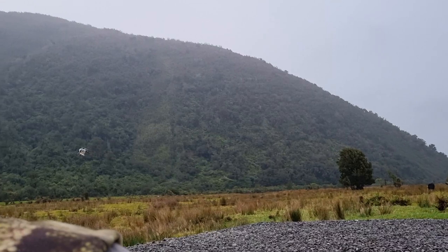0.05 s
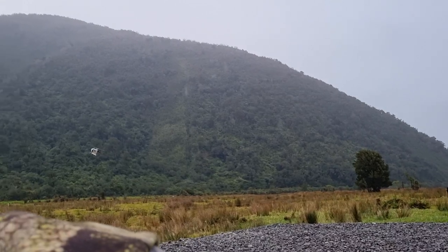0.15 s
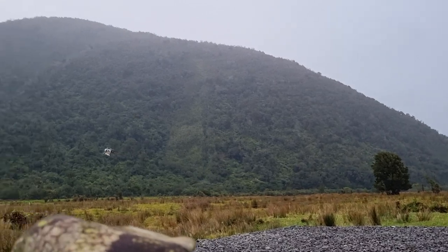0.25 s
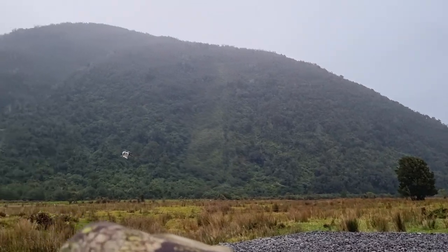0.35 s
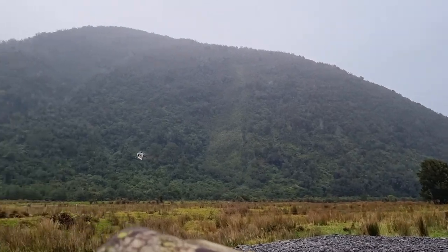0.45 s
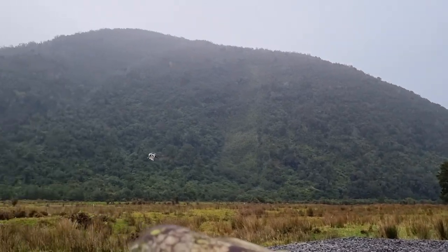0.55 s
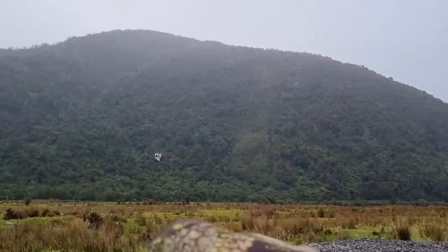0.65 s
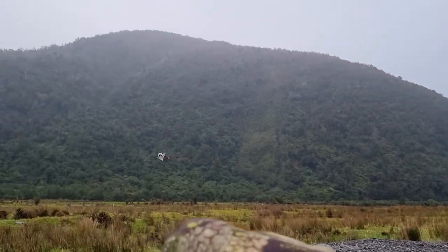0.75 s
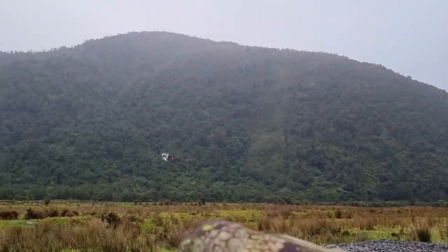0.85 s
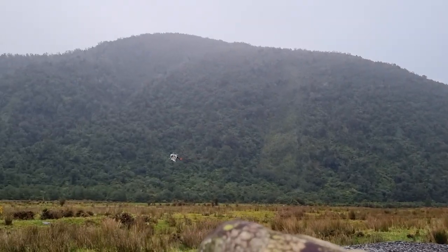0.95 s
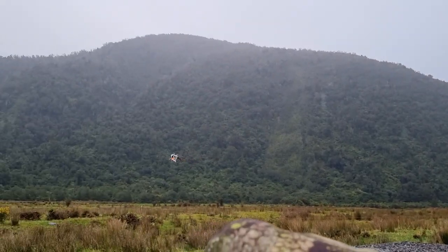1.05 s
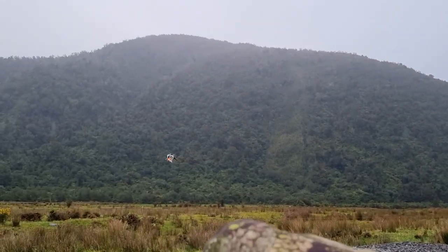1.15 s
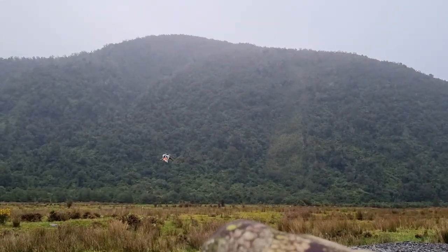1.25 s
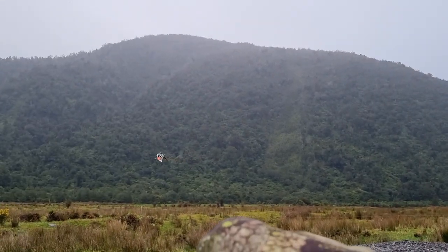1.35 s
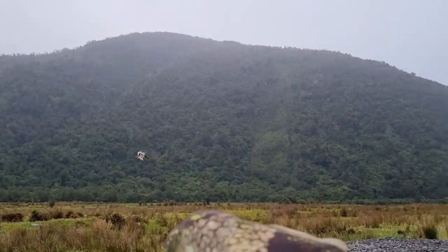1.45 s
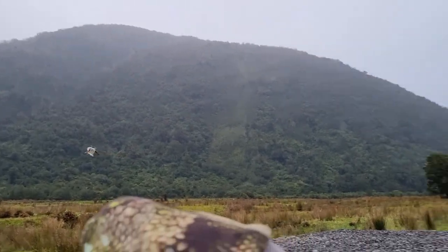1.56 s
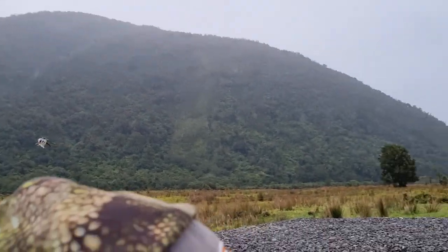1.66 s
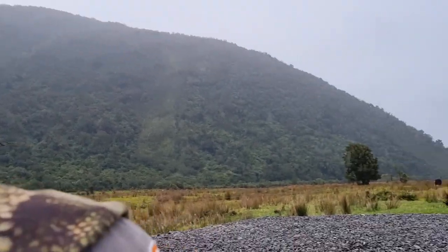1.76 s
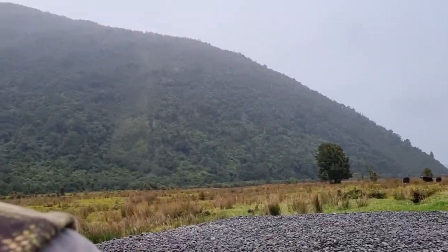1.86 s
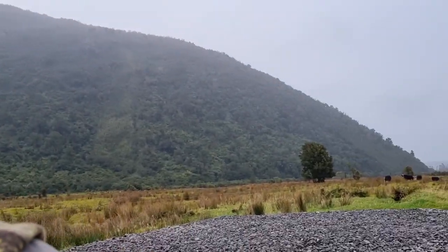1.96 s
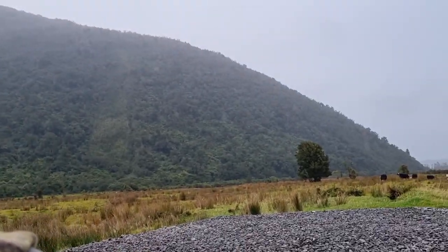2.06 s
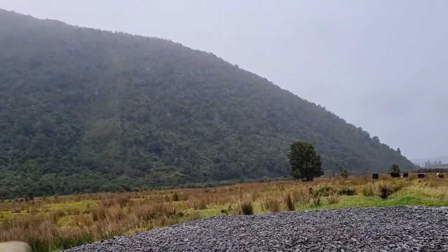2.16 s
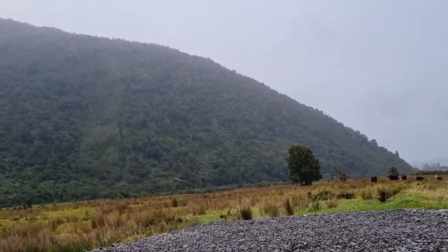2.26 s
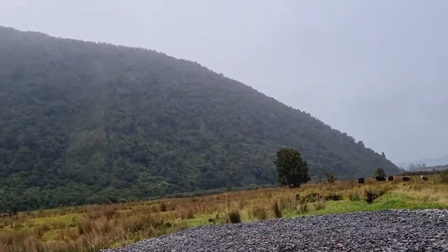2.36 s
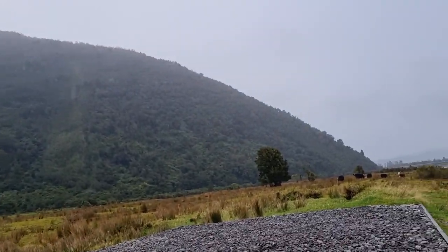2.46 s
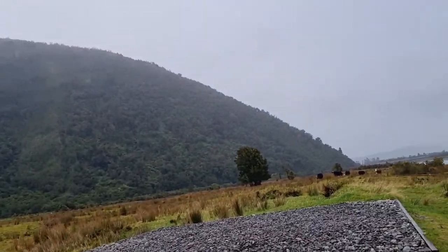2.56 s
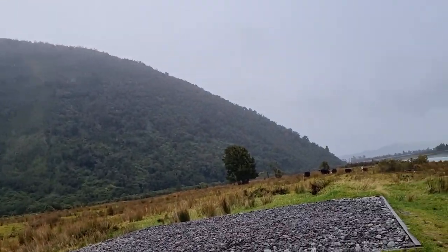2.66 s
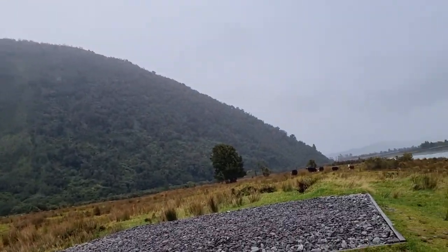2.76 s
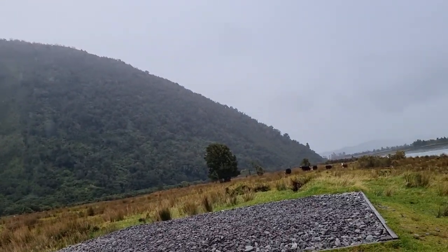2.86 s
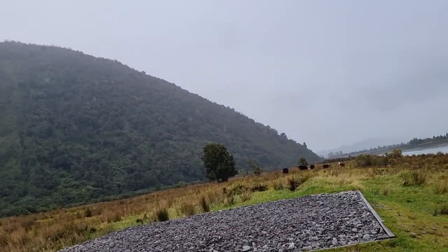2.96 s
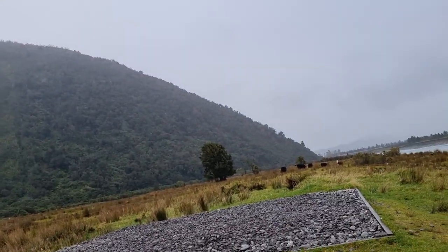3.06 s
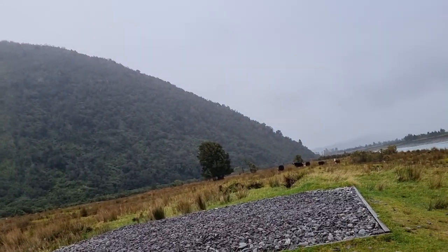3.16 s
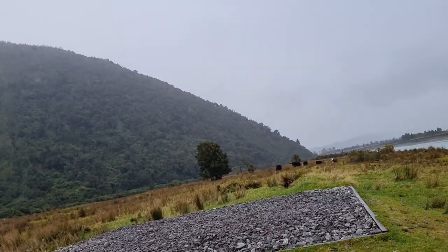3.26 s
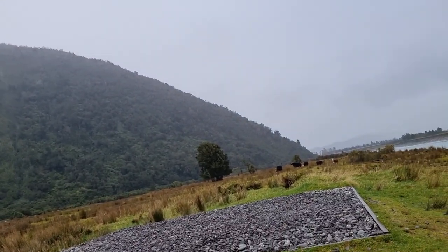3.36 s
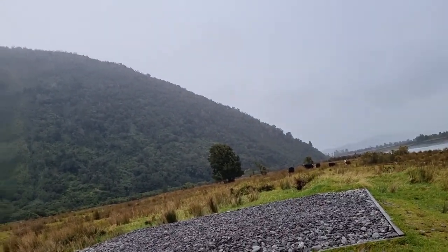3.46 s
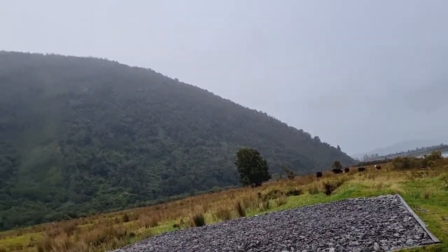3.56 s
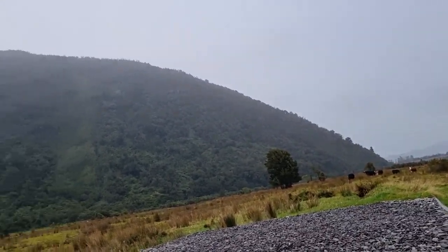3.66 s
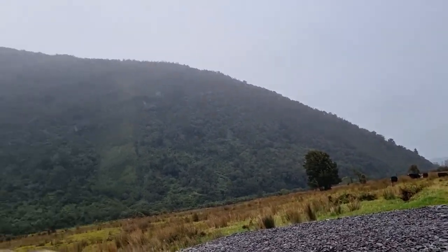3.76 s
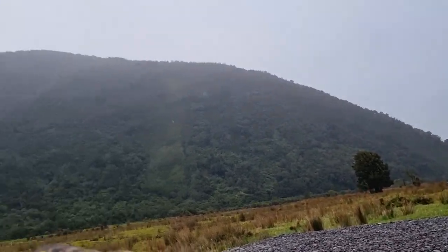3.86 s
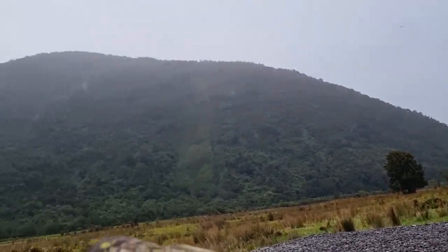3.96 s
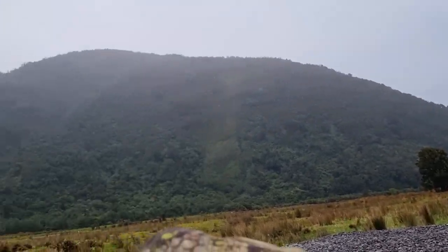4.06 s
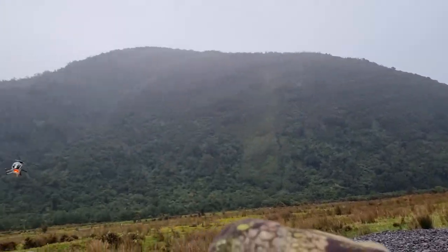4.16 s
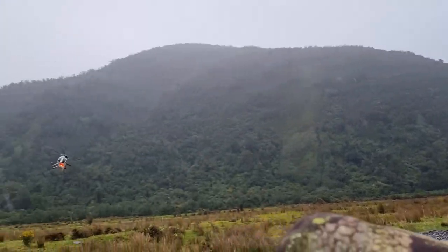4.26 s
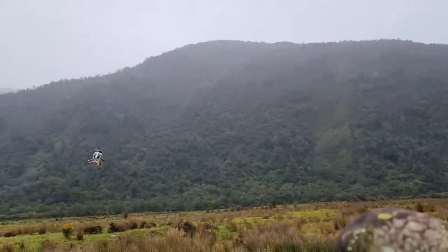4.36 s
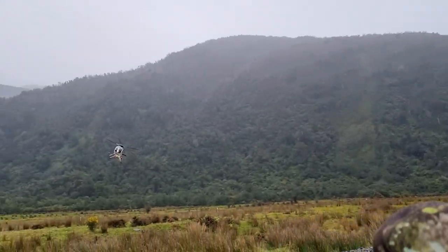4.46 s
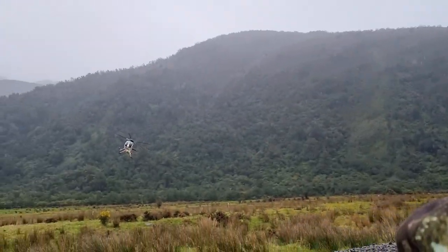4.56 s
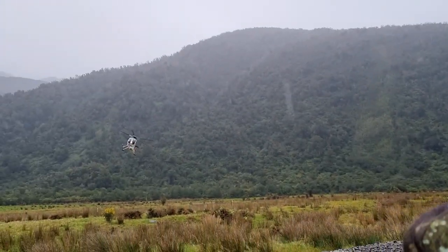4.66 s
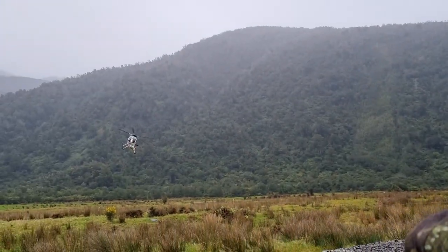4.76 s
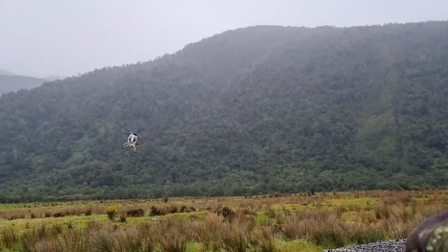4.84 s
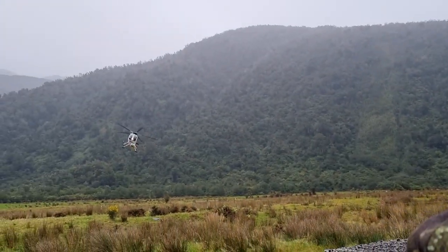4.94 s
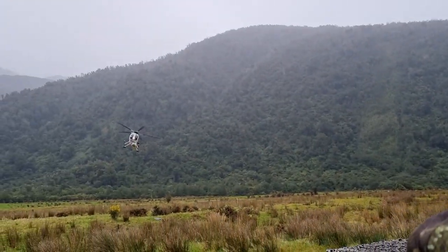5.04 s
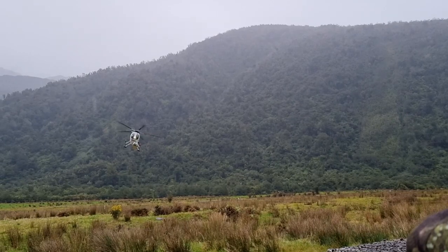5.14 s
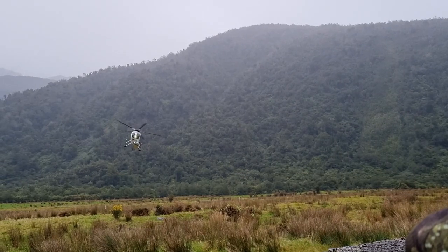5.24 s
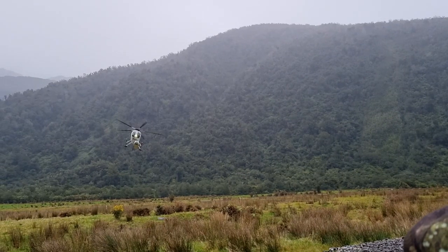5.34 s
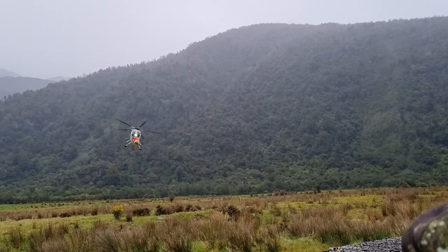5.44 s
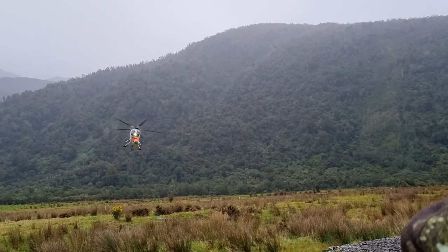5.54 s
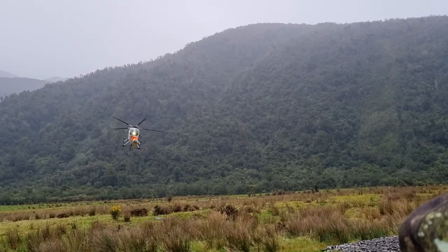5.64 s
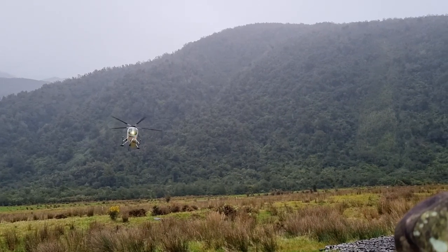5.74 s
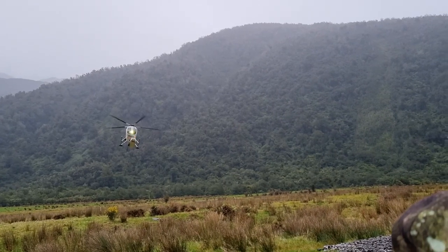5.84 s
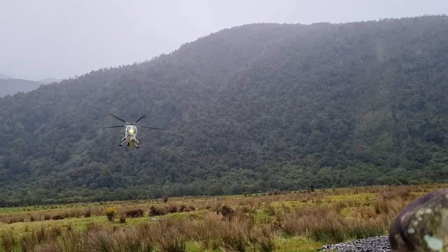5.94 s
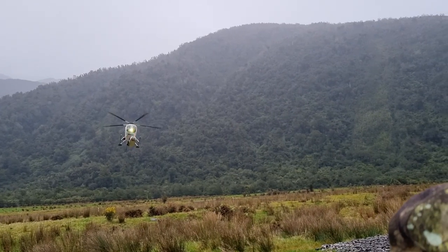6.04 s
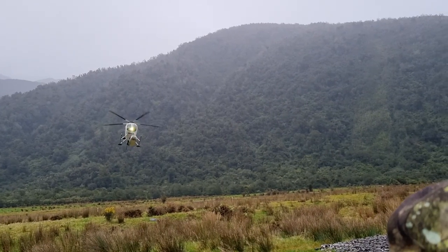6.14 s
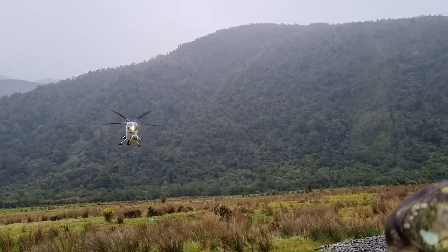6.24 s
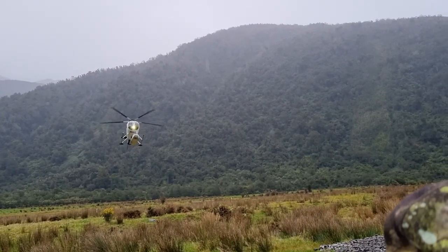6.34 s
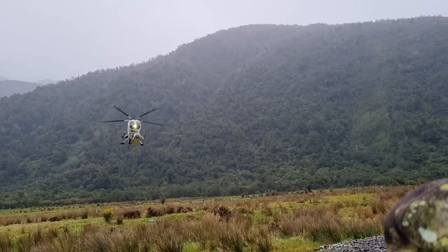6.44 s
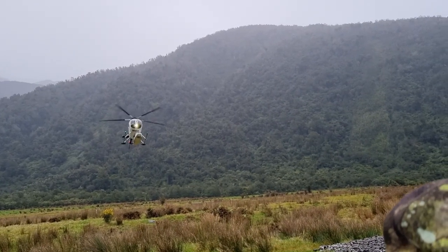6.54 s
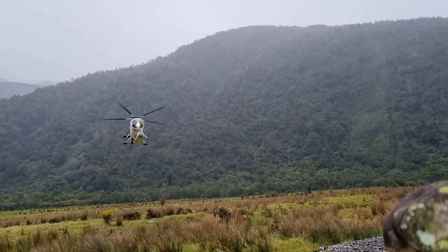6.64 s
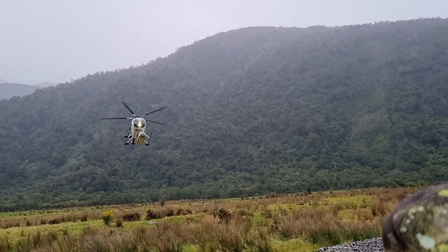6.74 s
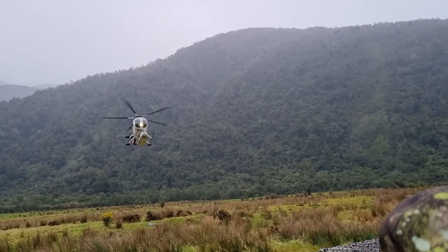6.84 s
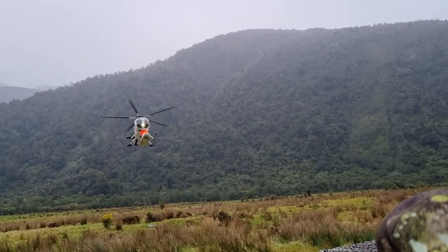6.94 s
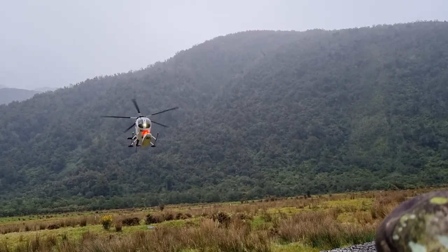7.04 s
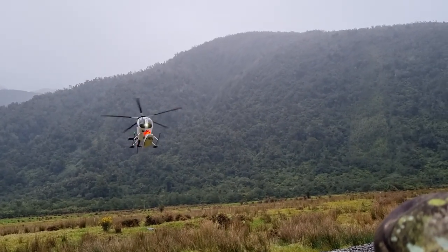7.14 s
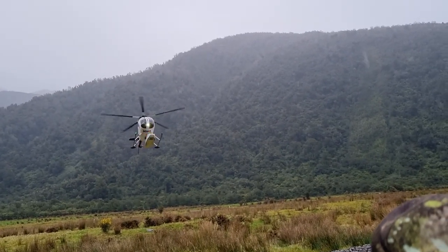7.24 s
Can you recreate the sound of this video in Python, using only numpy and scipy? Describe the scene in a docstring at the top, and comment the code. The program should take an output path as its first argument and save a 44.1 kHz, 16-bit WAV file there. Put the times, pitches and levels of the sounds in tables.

```python
"""A valley: a helicopter flies in low and slows to land in front of a hand-held pair of microphones.
Far off, the rotor throbs (blade-pass harmonics) under a wash of air noise (filtered, chopped noise).
As the machine slows, its blades cut their own tip vortices and slap (clusters of filtered pulses).
The tail rotor drones and a gear whines faintly (sines); the turbines hiss (noise); light ticks tap nearby.
The microphones swing away and back: port delay, echoes and colour follow."""
import sys
import numpy as np
from scipy import signal
from scipy.fft import rfft, irfft, next_fast_len
from scipy.io import wavfile
from scipy.ndimage import uniform_filter1d, map_coordinates

SR = 44100
rng = np.random.default_rng(int(sys.argv[2]) if len(sys.argv) > 2 else 0)


def store_pcm(level_fs):
    """Save levels as 16-bit WAV."""
    pcm = np.round(np.clip(level_fs, -1, 1) * 32767).astype(np.int16)
    wavfile.write(sys.argv[1], SR, np.atleast_2d(pcm).T)


N = 321930
TIME = np.arange(N) / SR

BLADE_HZ, FIRST_PASS = 41.9, 0.637  # main blade rate when hovering; share of a pass turned at the start
SOUND_SPEED_M_PER_S = 343
THIRD_ORDER_RE_SLAP_DB, SNAP_RE_SLAP_DB = -2.5, -27

# Boom of the rotor, second blade-pass order. Each row: time in seconds, level in dB.
BOOM_LEVEL = [(0.1, -37), (0.18, -32), (0.61, -38), (0.87, -30.5), (1.46, -33), (3.74, -25), (4.67, -36),
              (5.87, -16.5), (6.2, -19), (6.5, -21), (7.2, -18.5)]


def throb(passes, waver_db=1.03):
    """Each blade pushes a pressure wave ahead of it; the orders waver in moving air, the higher ones more."""
    first_db = approach_db(far_db=-37.5, near_db=-29)
    boom_db = in_time(BOOM_LEVEL)[0]
    third_db = np.maximum(approach_db(far_db=-57, near_db=-36), flare_db() + THIRD_ORDER_RE_SLAP_DB)
    out = 0
    for order, db in enumerate([first_db, boom_db, third_db], 1):
        late = .47 + .003 * order * drift(8)
        gain = np.sqrt(2) * from_db(db + waver_db * order * drift(22.0))
        out = out + gain * np.cos(2 * np.pi * order * (passes - late))
    return at_ports(out, bend=3.3)


# Low push of each slap, blade-pass orders 4 to 7. Each entry: peak level in dB against the slap.
PUSH_RE_SLAP_DB = [-6, -14.5, -20.5, -15.5]
# Vortex cut moving round the disc as the rotor tilts. Each row: time in seconds, lateness in blade passes.
CUT_LATENESS = [(4.6, -.17), (5.0, -.08), (5.4, -.03), (5.8, .04), (6.6, .005), (7.3, -.01)]
# Spectrum of thud and crack. Each row: frequency in Hz, relative level in dB.
KNOCK_SPECTRUM = [(215, -4.5), (280, -1), (385, 6), (450, 2), (540, 2.5), (780, 4.5), (900, -2),
                  (1200, 0.5), (1600, -3), (2000, -10.5), (3500, -28)]
# Spectrum of the bright snap. Each row: frequency in Hz, relative level in dB.
SNAP_SPECTRUM = [(1600, 9), (1900, 3.5), (2200, 9), (2550, -4), (2950, 12.5), (3400, -0.5), (4200, 3.5),
                 (6000, -3)]


def slap(passes):
    """The vortex cuts: a thud, a crack above it and a bright snap on its front."""
    thud_db, crack_db, snap_db = slap_levels()
    turned = passes - in_time(CUT_LATENESS)[0]
    cuts = blade_pulses(turned, spread_s=.00078, jitter_s=.00016, uneven_db=0.7)
    raw_knock = rms_one(cuts) + .45 * torn_air(cuts, decay_s=.003)
    knock = steady(colour(raw_knock, KNOCK_SPECTRUM, 200, 2300))
    thud = colour(knock, [(900, 0)], high_hz=900)
    crack = knock - thud
    fronts = blade_pulses(turned, spread_s=.0004, jitter_s=.0002, uneven_db=1)
    snap = steady(colour(torn_air(fronts, decay_s=.0007), SNAP_SPECTRUM, 1450, 4500))
    push = sum(from_db(db) * np.cos(2 * np.pi * k * turned) for k, db in enumerate(PUSH_RE_SLAP_DB, 4))
    body = from_db(thud_db) * thud + from_db(crack_db) * crack + from_db(flare_db()) * push
    return at_ports(body, bend=1.54) + at_ports(from_db(snap_db) * snap, bend=0.81)


SLAP_START_S, SLAP_FULL_S = 4.75, 5.68
SLAP_START_DB, SLAP_FULL_DB, CRUISE_SLAP_DB = -30.5, -21, -61
SLAP_ONSET_DB_PER_S, SLAP_EASE_DB_PER_S = 83, 1


def flare_db():
    """Strength of the blade slap: quick onset, build-up and slow easing."""
    build = np.interp(TIME, [SLAP_START_S, SLAP_FULL_S], [SLAP_START_DB, SLAP_FULL_DB])
    onset = SLAP_ONSET_DB_PER_S * np.maximum(SLAP_START_S - TIME, 0)
    ease = SLAP_EASE_DB_PER_S * np.maximum(TIME - SLAP_FULL_S, 0)
    return np.maximum(build - onset - ease, CRUISE_SLAP_DB)


HARD_FADE_DB_PER_S = 302  # to either side of a hard slap
# Hard slaps, where a blade meets a strong old vortex.
# Each row: time in seconds, thud in dB, crack in dB, snap in dB.
STRONG_VORTEX_CUTS = [(4.991, -29, -15, -34), (5.062, -20.5, -22, -40), (5.085, -19.5, -19.0, -40),
                      (5.11, -20.5, -11, -35), (5.18, -18, -18.5, -39), (5.229, -20.5, -15, -33.5),
                      (5.348, -17.0, -14, -34), (5.371, -13, -23, -30), (5.397, -17, -16.5, -31.5),
                      (5.419, -14, -13, -40.5), (5.442, -19.0, -22, -44.5), (5.538, -14, -11.5, -44.5),
                      (5.563, -14.5, -14.5, -39.0), (5.611, -14, -14.5, -39), (5.636, -16.5, -12, -37),
                      (5.659, -15.0, -18.0, -41), (5.682, -15.0, -12, -33), (5.731, -16.5, -17.5, -37),
                      (5.756, -16.0, -9.5, -35), (5.779, -15.5, -15, -35.5), (5.802, -17, -13.5, -36),
                      (5.826, -19, -17, -38.5), (5.875, -17.5, -24.0, -43), (5.898, -13.5, -16, -35.5),
                      (5.921, -14.0, -15.0, -40.5), (5.97, -16.5, -23.0, -39.5),
                      (5.994, -15.5, -20.5, -40.0), (6.018, -14.0, -13, -31.5), (6.039, -14, -13, -42.5),
                      (6.063, -16.5, -21, -45.5), (6.089, -19, -16, -40.5), (6.113, -16, -17.5, -39.5),
                      (6.136, -15, -16.5, -33), (6.159, -14.5, -15, -41.5), (6.183, -17.0, -14, -41),
                      (6.255, -17.5, -16, -34), (6.278, -16.5, -14, -36.0), (6.302, -16.0, -12.5, -34),
                      (6.35, -17, -25.0, -46.5), (6.374, -13.5, -15.0, -35.0), (6.398, -17.0, -13, -38),
                      (6.421, -14, -11.5, -38), (6.54, -14.5, -13, -37), (6.564, -13.5, -19, -42.0),
                      (6.588, -18, -20, -44.5), (6.612, -18, -19.5, -41.5), (6.659, -16.5, -10.5, -27),
                      (6.706, -13.5, -14, -32), (6.755, -16, -18.5, -35.0), (6.778, -20, -11.5, -25.5),
                      (6.802, -15, -21.0, -32), (6.826, -17.5, -16, -30.5), (6.897, -18, -12.5, -28.5),
                      (6.921, -17.5, -20.5, -34.0), (6.945, -16, -15.5, -27), (7.016, -16.5, -16.0, -29.5),
                      (7.136, -18.0, -16.0, -30), (7.159, -16.5, -20, -40), (7.184, -17.5, -16.5, -38.0),
                      (7.208, -17.5, -11.5, -35), (7.256, -19, -16, -29.5)]


def slap_levels():
    """Thud, crack and snap in dB; each strong vortex lifts them briefly."""
    levels = flare_db() + np.array([[0], [0], [SNAP_RE_SLAP_DB]])
    for s, *hard_db in STRONG_VORTEX_CUTS:
        near = slice(int(s * SR) - SR // 10, int(s * SR) + SR // 10)
        lift_db = np.array(hard_db)[:, None] - HARD_FADE_DB_PER_S * np.abs(TIME[near] - s)
        levels[:, near] = np.maximum(levels[:, near], lift_db)
    return levels


def blade_pulses(passes, spread_s, jitter_s, uneven_db):
    """Each blade pass gives four pulses of alternating sign within milliseconds, of fairly even total energy."""
    when = np.interp(np.arange(np.ceil(passes[0]), passes[-1]), passes, TIME)[:, None]
    chance = rng.standard_normal((len(when), 10))
    place = np.arange(4) - 1.5
    signs = (-1) ** np.arange(1, 5)
    sizes = signs * np.exp(-np.abs(place + .5) / 2.5) * (1 + .2 * chance[:, 2:6])
    sizes = sizes / np.linalg.norm(sizes, axis=1, keepdims=True)
    sizes = sizes * from_db(uneven_db * np.tanh(chance[:, 1:2]))
    at_s = when + jitter_s * chance[:, :1] + spread_s * (place + .27 * chance[:, 6:])
    pulses = np.zeros(N)
    pulses[np.clip(at_s * SR, 0, N - 1).astype(int)] = sizes
    return pulses


def torn_air(pulses, decay_s):
    """Each pulse leaves a burst of turbulence that dies within milliseconds."""
    envelope = signal.lfilter([1], [1, -np.exp(-1 / (decay_s * SR))], np.abs(pulses))
    return rms_one(envelope * rng.standard_normal(N))


# Advancing tip moving round the disc as the rotor tilts. Each row: time in seconds, lateness in blade passes.
TIP_LATENESS = [(1.9, -.17), (3.2, -.12), (4.0, -.02), (4.5, .08), (5.4, .2), (6.0, .23)]
# Swish of the advancing tip. Each row: time in seconds, hollow chop in dB, bright edge in dB.
TIP_LEVELS = [(1.6, -43, -48), (2.6, -45.5, -50), (3.3, -37, -46), (3.9, -33, -41.5), (4.2, -31.5, -36.5),
              (4.45, -32.5, -32.5), (5.0, -29.5, -34), (5.8, -33.5, -39.5), (7.3, -40, -41.5)]
# Spectrum of the hollow chop. Each row: frequency in Hz, relative level in dB.
TIP_CHOP_SPECTRUM = [(500, -3.5), (900, 0), (1300, 5), (1650, 2.5), (2000, 1.5)]
# Spectrum of the bright edge. Each row: frequency in Hz, relative level in dB.
TIP_EDGE_SPECTRUM = [(2300, 2.5), (2700, -3), (3300, 7.5), (4200, -4.5), (5000, -7), (6200, 0),
                     (8000, -7.5)]


def tip_swish(passes, early_passes=.05):
    """Each advancing tip throws a short burst of noise forwards: a hollow chop with a bright edge."""
    turned = passes - in_time(TIP_LATENESS)[0] + early_passes
    tips = blade_pulses(turned, spread_s=.0008, jitter_s=.0002, uneven_db=1)
    bursts = torn_air(tips, decay_s=.0011)
    chop_db, edge_db = in_time(TIP_LEVELS)
    hollow = from_db(chop_db) * steady(colour(bursts, TIP_CHOP_SPECTRUM, 420, 1950))
    edge = from_db(edge_db) * steady(colour(bursts, TIP_EDGE_SPECTRUM, 2230, 7200))
    return at_ports(hollow, bend=1.7, most_ms=0.39) + at_ports(edge)


# Spectrum of the buffet. Each row: frequency in Hz, relative level in dB.
BUFFET_SPECTRUM = [(185, 7), (230, -15), (280, -41), (340, -2.5), (390, 2.5), (470, 3)]


def buffet(passes):
    """A low fluttering roar as the slowing rotor sinks into its own wake: chopped narrow-band noise."""
    level_db = air_db(far_db=-53, near_db=-46, swell_db=21, swell_s=5.41, width_s=1)
    roar = turbulence(BUFFET_SPECTRUM, 233, 357, scattered=0.074, bend=2.9)
    return from_db(level_db) * roar * chop(passes, 0.51, 0.047)


# Spectrum of the wake rumble. Each row: frequency in Hz, relative level in dB.
WAKE_SPECTRUM = [(25, -32), (55, -15), (100, -2.5), (135, 0.5), (170, -7), (200, -10), (290, -14)]
# Spectrum of the downwash. Each row: frequency in Hz, relative level in dB.
WASH_SPECTRUM = [(260, -12), (320, 1), (390, 1), (440, -3), (520, 4), (610, -3.5), (730, 0.5), (900, 1)]
# Spectrum of the blade swish. Each row: frequency in Hz, relative level in dB.
SWISH_SPECTRUM = [(900, 4), (1030, 7), (1200, 8.5), (1450, 6), (1650, 5.5), (1900, -7.5)]
# Spectrum of exhaust, hiss and sizzle. Each row: frequency in Hz, relative level in dB.
JET_SPECTRUM = [(1850, 12.5), (2100, 11.5), (2450, 5), (3100, 9), (4100, 4.5), (5000, -3), (6400, 0.5),
                (7400, -5.5), (8700, -5.5), (10500, -16.5), (12500, -18), (16000, -17.5)]
# Turbine hiss. Each row: time in seconds, level in dB before HISS_GAIN_DB.
HISS_LEVEL = [(0.15, -49.5), (0.41, -51), (1.02, -47), (2.68, -44.5), (4.04, -38), (4.16, -37),
              (4.52, -40.5), (7.25, -42)]
# Topmost treble. Each row: time in seconds, level in dB before SIZZLE_GAIN_DB.
SIZZLE_LEVEL = [(0.45, -91.5), (1.02, -66.5), (2.4, -53), (2.46, -50.5), (2.63, -60.5), (4.26, -46),
                (4.33, -51), (4.39, -46), (5.28, -51), (7.02, -45), (7.25, -43)]
HISS_GAIN_DB, SIZZLE_GAIN_DB = 3, 5


def rotor_air(passes):
    """Wake rumble, downwash and blade swish, then exhaust and turbine hiss heard through the turning rotor."""
    near = np.interp(TIME, [3.8, 4.5], [.4, 1])  # the chop deepens close by

    wake_db = air_db(far_db=-39, near_db=-32.5, swell_db=7, swell_s=4.88, width_s=0.32)
    wake = from_db(wake_db) * turbulence(WAKE_SPECTRUM, 45, 414, scattered=0.094, bend=0.7)

    wash_db = air_db(far_db=-31.5, near_db=-29, swell_db=3.5, swell_s=5.35, width_s=0.19) + 0.23 * drift(8.6)
    wash = from_db(wash_db) * turbulence(WASH_SPECTRUM, 355, 770, scattered=0.28, bend=1.49)
    wash = wash * chop(passes, 2 * near, -0.12)

    swish_db = air_db(far_db=-35.5, near_db=-32.5, swell_db=7, swell_s=5.36, width_s=0.5) + drift(48)
    swish = turbulence(SWISH_SPECTRUM, 690, 1840, scattered=0.27, bend=1.46, most_ms=0.41)
    swish = from_db(swish_db) * swish * chop(passes, 2.4 * near, -0.012)

    exhaust_db = air_db(far_db=-43, near_db=-38.5, swell_db=5, swell_s=4.83, width_s=0.87) + 0.73 * drift(22.0)
    exhaust = from_db(exhaust_db) * turbulence(JET_SPECTRUM, 1650, 4340, scattered=0.48)
    exhaust = exhaust * chop(passes, 0.76 * near, 0.012)

    hiss_db = in_time(HISS_LEVEL)[0] + HISS_GAIN_DB + 0.85 * drift(15)
    hiss = from_db(hiss_db) * turbulence(JET_SPECTRUM, 4180, 10600, scattered=0.45)
    hiss = hiss * chop(passes, 1.85 * near, 0.034)

    sizzle_db = in_time(SIZZLE_LEVEL)[0] + SIZZLE_GAIN_DB
    sizzle = from_db(sizzle_db) * turbulence(JET_SPECTRUM, 10000, 14400, scattered=0.52)
    sizzle = sizzle * chop(passes, 1.5 * near, 0.04)
    return wake + wash + swish + exhaust + hiss + sizzle


# Tail rotor as a whole. Each row: time in seconds, level in dB.
TAIL_LEVEL = [(0, -40), (.85, -45.5), (1.3, -36.5), (2.9, -30), (3.7, -30.5), (4.3, -33), (4.9, -30),
              (5.8, -30), (7.3, -40)]
# Tail rotor tones. Each row: multiple of the main blade rate, level in dB against TAIL_LEVEL.
TAIL_TONES = [(1.802, -8.5), (3.604, 0), (5.406, -14.5), (7.208, -12), (12.62, -11)]


def tail_rotor(passes, waver_db=1.9):
    """Geared to the main rotor, it drones on a few tones."""
    turns = passes + .005 * drift(4)
    tones = 0
    for order, db in TAIL_TONES:
        tones = tones + from_db(db + waver_db * drift(1.76)) * np.sin(2 * np.pi * order * turns)
    return at_ports(np.sqrt(2) * from_db(in_time(TAIL_LEVEL)[0]) * tones, bend=1.95)


# Gear tones, each beamed at the listener for a while.
# Each row: frequency in Hz when hovering, level in dB, loudest at seconds, fade in dB per second.
GEAR_BEAMS = [(1132, -44.5, .1, 2.5), (1166, -36.5, 1.6, 4), (1284, -44.5, .1, 2.5)]
GEAR_RISE_DB_PER_S = 20


def gearbox(passes, flutter_db=3.5):
    """Thin gear tones, raised in pitch by the approach; each comes up quickly and fades slowly."""
    seconds = passes / BLADE_HZ + 2e-5 * drift(4)
    tones = 0
    for hz, db, loudest_s, fade_db_per_s in GEAR_BEAMS:
        loss_db = np.maximum(GEAR_RISE_DB_PER_S * (loudest_s - TIME), fade_db_per_s * (TIME - loudest_s))
        tones = tones + from_db(db - loss_db + flutter_db * drift(9.7)) * np.sin(2 * np.pi * hz * seconds)
    return at_ports(np.sqrt(2) * tones)


# Light ticks near the microphones. Each row: time in seconds, envelope peak in dB before noise and filter.
TICK_TAPS = [(1.385, -37), (2.27, -42), (3.005, -33), (3.21, -42), (3.55, -28)]


def ticks(decay_s=.0012):
    """Tiny bright taps: decaying bursts of high-passed noise."""
    taps = np.zeros(N)
    for s, db in TICK_TAPS:
        taps[round(s * SR)] = from_db(db)
    envelope = signal.lfilter([1], [1, -np.exp(-1 / (decay_s * SR))], taps + 1e-18)
    return colour(envelope * rng.standard_normal((2, N)), [(4000, -4), (15000, 3)], 3700, 17000)


# Two reflections from close by. Each row: time in seconds, first delay in ms, second delay in ms.
NEAR_DELAYS = [(0, .9, 1.28), (.6, .76, 1.08), (1.3, .69, .95), (1.6, .85, 1.05), (1.9, .75, .95),
               (3.3, .72, .92), (4.3, .72, 1.2), (7.3, .72, 1.3)]


def near_echoes(x, first_db=-15, second_db=-15):
    """The person holding the microphones reflects the sound; the comb this makes slides as they turn."""
    bright = colour(x, [(1000, -6.5), (10000, -10)], 830, 12000)
    paths = list(zip(from_db([first_db, second_db]), in_time(NEAR_DELAYS)))
    ports = [sum(gain * np.interp(TIME - ms / 1000, TIME, port) for gain, ms in paths) for port in bright]
    return np.array(ports)


def turbulence(points, low_hz, high_hz, scattered, bend=1, most_ms=2):
    """Stereo noise: a share comes straight from the helicopter, the rest is scattered by ground and hillside."""
    white = rng.standard_normal((3, N))
    share = np.clip(scattered, 0, 1)
    direct = np.sqrt(1 - share) * at_ports(white[0], bend, most_ms)
    return rms_one(colour(direct + np.sqrt(share) * white[1:], points, low_hz, high_hz))


def chop(passes, depth_db, late):
    """Noise swells once as each blade sweeps towards the listener."""
    return rms_one(from_db(depth_db * np.cos(2 * np.pi * (passes - late))))


CRUISE_M_PER_S, CREEP_M_PER_S, BRAKED_AT_S = 13.985, 0.476, 5.206
DIVE_M_PER_S, DIVE_S = 3.3, .55  # extra speed left from the descent, and its decay time


def flown():
    """Metres flown towards the listener so far: braking ever harder, then creeping."""
    braking = np.maximum(1 - (TIME / BRAKED_AT_S) ** 2, 0)
    speed = CREEP_M_PER_S + (CRUISE_M_PER_S - CREEP_M_PER_S) * braking
    return np.cumsum(speed + DIVE_M_PER_S * np.exp(-TIME / DIVE_S)) / SR


def approach_db(far_db, near_db):
    """A level that grows in step with the way flown."""
    metres = flown()
    return far_db + (near_db - far_db) * metres / metres[-1]


def air_db(far_db, near_db, swell_db, swell_s, width_s):
    """A level that grows with the approach and swells once as the rotor sinks through its own wake."""
    return approach_db(far_db, near_db) + swell_db * np.exp(-((TIME - swell_s) / width_s) ** 2)


# Bearing of the helicopter as the microphones swing away and back.
# Each row: time in seconds, delay of the right port in ms before bend and limit.
PORT_DELAY = [(0, .11), (.5, .02), (.95, -.01), (1.35, .03), (1.75, .22), (2.1, .29), (2.75, .37),
              (3.3, .4), (3.7, .33), (4.1, .2), (4.45, .075), (5.9, .13), (7.3, .125)]


def at_ports(x, bend=1, most_ms=2):
    """One port hears the sound later; long waves bend round the body and lag more, up to a limit."""
    half = np.minimum(in_time(PORT_DELAY)[0] * bend, most_ms) * SR / 2000  # samples
    ports = [map_coordinates(x, [np.arange(N) + side * half], order=2, mode="nearest") for side in (1, -1)]
    return np.array(ports)


def from_db(db):
    """Decibels to gain."""
    return 10 ** (np.asarray(db) / 20)


def rms_one(x):
    """Scale to unit power."""
    return x / np.sqrt(np.mean(x ** 2) + 1e-20)


def steady(x):
    """Unit power over every few blade passes."""
    power = uniform_filter1d(uniform_filter1d(x ** 2, size=3158), size=1053)
    return x / np.sqrt(np.maximum(power, 0) + 1e-3 * power.mean())


def in_time(rows):
    """Each column of a curve, sample by sample."""
    s, *columns = np.transpose(rows)
    return [np.interp(TIME, s, c) for c in columns]


def drift(rate_hz):
    """Slow random wander of spread 1, drawn every 40 samples."""
    r = np.exp(-80 * np.pi * rate_hz / SR)
    slow = signal.lfilter([1], [1, -2 * r, r * r], rng.standard_normal(N // 40 + 2002))[2000:]
    return np.interp(np.arange(N) / 40, np.arange(len(slow)), rms_one(slow))


def colour(x, points, low_hz=10, high_hz=20000):
    """Filter by a spectrum of (Hz, dB) points, closed steeply at both ends."""
    size = next_fast_len(N + 4096)
    hz = np.maximum(np.arange(size // 2 + 1) * SR / size, 1)
    knots, db = np.transpose(points)
    edges = (1 + (low_hz / hz) ** 16) * (1 + (hz / high_hz) ** 16)
    gain = from_db(np.interp(np.log(hz), np.log(knots), db)) / np.sqrt(edges)
    return irfft(rfft(x, size) * gain, size)[..., :N]


def scene():
    """The shrinking distance brings the blade passes earlier and lifts every tone."""
    passes = FIRST_PASS + BLADE_HZ * (TIME + flown() / SOUND_SPEED_M_PER_S)
    main_rotor = throb(passes) + slap(passes) + tip_swish(passes) + buffet(passes)
    air = rotor_air(passes - in_time(TIP_LATENESS)[0])
    helicopter = main_rotor + air + tail_rotor(passes) + gearbox(passes)
    return helicopter + near_echoes(helicopter) + ticks()


# Microphone colour when pointed at the helicopter. Each row: frequency in Hz, gain in dB.
FACING_SPECTRUM = [(160, 0.5), (240, 3.5), (330, -2), (900, -1), (1600, -.5), (2000, -5), (2450, 3.5),
                   (3000, 0.5), (5000, -1)]
# Microphone colour when turned aside. Each row: frequency in Hz, gain in dB.
ASIDE_SPECTRUM = [(160, -1), (240, -2), (400, -3.5), (700, 3), (1000, 0), (1450, -5), (1900, 4),
                  (2400, -4.5), (3000, 2), (4000, -4), (5000, 0), (6500, -3.5)]
# Balance of the two ports. Each row: frequency in Hz, left minus right in dB.
LEFT_RE_RIGHT = [(220, -1), (390, 3.5), (650, -1.5), (1000, -0.5), (1700, -3.5), (2200, -6.5), (2650, 8),
                 (3400, -3), (4500, -2.5), (7000, 0.5), (16000, 0)]
CUTOFF_HZ = 15900


def record(dry):
    """The colour follows the aim and differs between the ports; the tallest peaks are rounded, the top is cut."""
    aside = np.interp(in_time(PORT_DELAY)[0], [.14, .32], [0, 1])
    aimed = (1 - aside) * colour(dry, FACING_SPECTRUM) + aside * colour(dry, ASIDE_SPECTRUM)
    balance = [(160, 0)] + list(LEFT_RE_RIGHT)
    ports = [colour(x, [(hz, side * db / 2) for hz, db in balance]) for x, side in zip(aimed, (1, -1))]
    ports = np.array(ports)
    rounded = ports / (1 + ports ** 6) ** (1 / 6)
    low_pass = signal.ellip(12, .1, 80, CUTOFF_HZ, fs=SR, output="sos")
    return signal.sosfilt(low_pass, rounded)


dry = scene()
out = record(dry)
store_pcm(out)
```